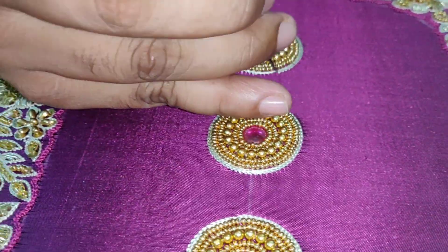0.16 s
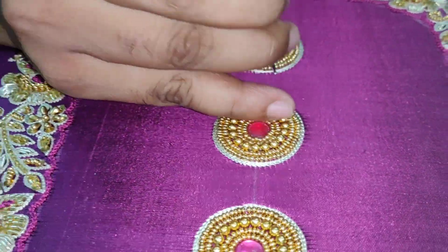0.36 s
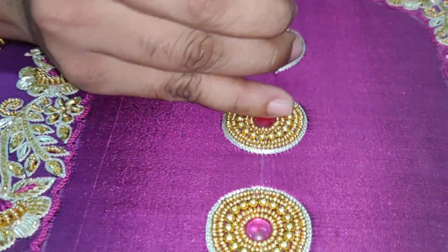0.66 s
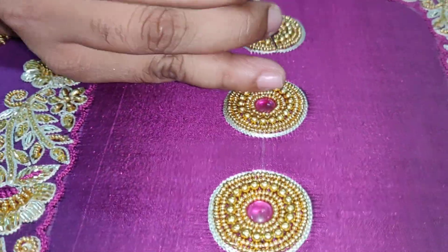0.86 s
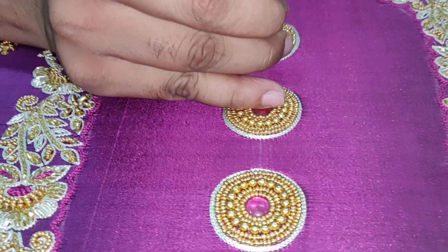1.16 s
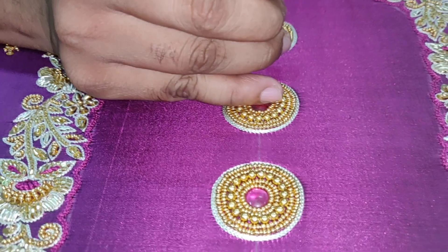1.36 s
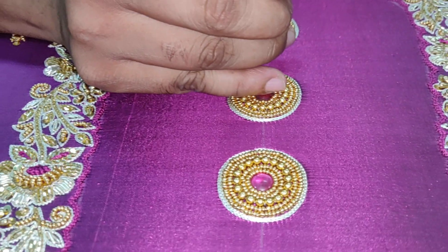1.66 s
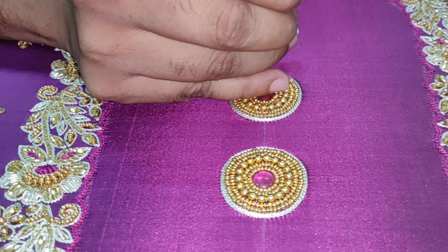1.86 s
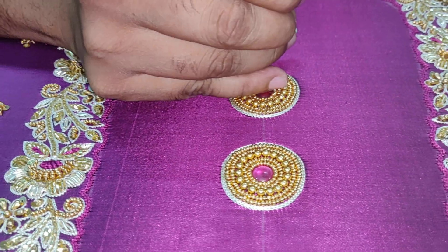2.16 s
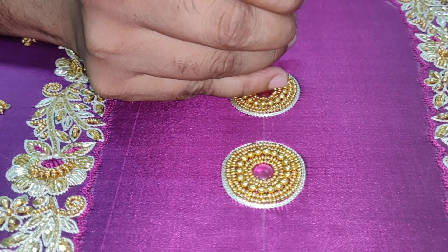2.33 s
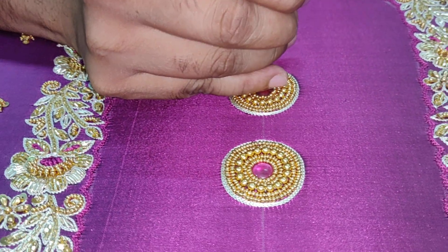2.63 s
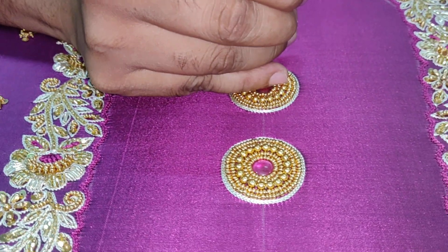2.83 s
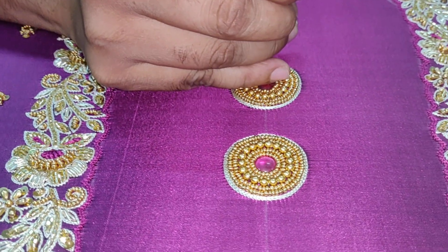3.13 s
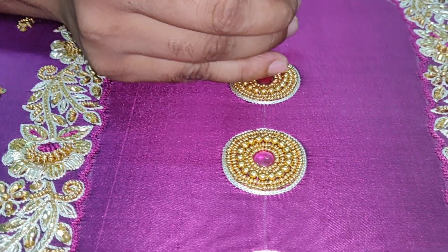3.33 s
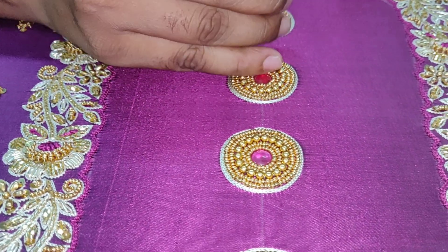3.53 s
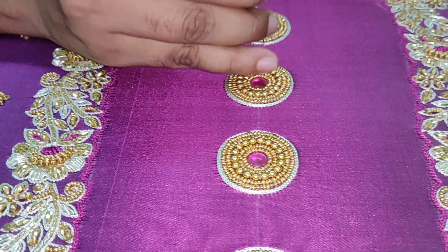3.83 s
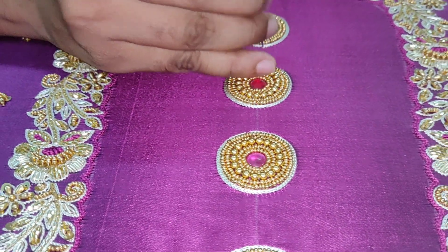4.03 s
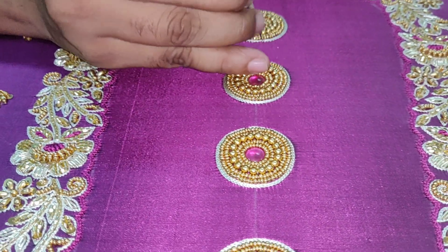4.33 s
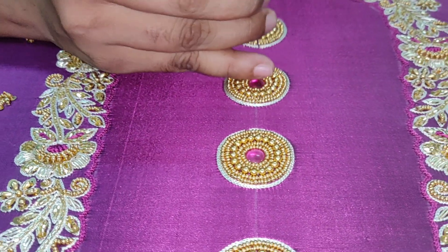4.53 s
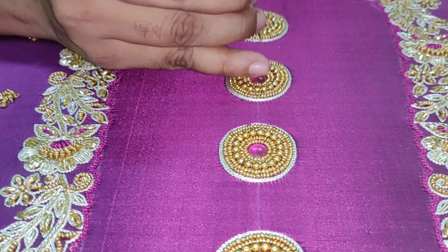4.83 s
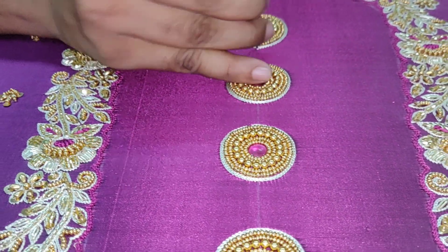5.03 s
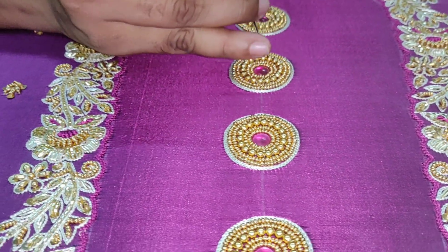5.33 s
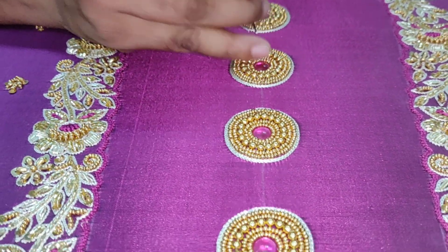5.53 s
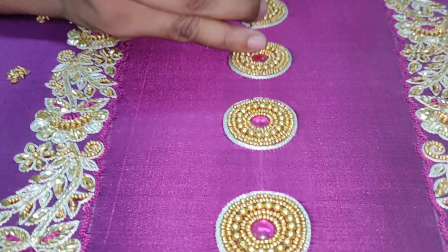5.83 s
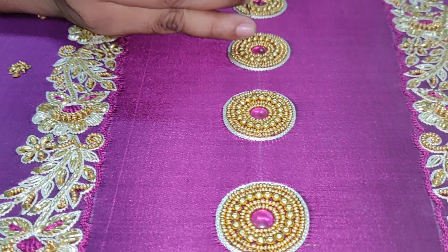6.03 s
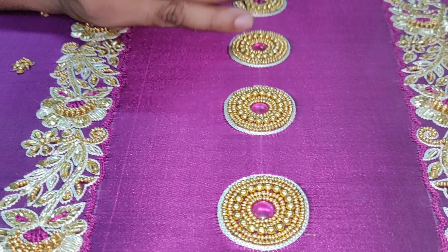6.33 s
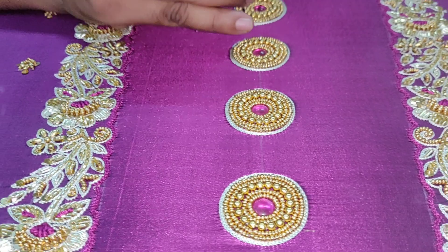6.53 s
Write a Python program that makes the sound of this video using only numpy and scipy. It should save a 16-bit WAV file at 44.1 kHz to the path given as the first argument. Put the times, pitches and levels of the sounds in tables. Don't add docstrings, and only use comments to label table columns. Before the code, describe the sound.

Irregular muffled taps on stretched fabric open the scene, some with a crisp prick through the weave. A longer quiet stretch follows, with grainy thread friction, a few bead knocks and little finger clicks. Light taps resume and become a brisk regular series of rounded thumps to the end. Everything is close and dry in a quiet room, picked up by a hand-held phone with low handling noise and a faint high hissing tone.

```python
import sys
import numpy as np
from scipy import signal
from scipy.fft import rfft, irfft
from scipy.io import wavfile
from scipy.ndimage import uniform_filter1d

SR = 44100
rng = np.random.default_rng(int(sys.argv[2]) if len(sys.argv) > 2 else 0)


def file_out(sig):
    cols = np.atleast_2d(sig).T
    lim = np.clip(cols, -1, 1)
    pcm = np.round(lim * 32767).astype(np.int16)
    wavfile.write(sys.argv[1], SR, pcm)


def gain_from_db(level_db):
    decades = np.asarray(level_db, float) / 20
    return 10 ** decades


N = 294588


def colour(x, points):
    hz, db = np.transpose(points)
    f = np.fft.rfftfreq(N, 1 / SR) + 1
    gain_db = np.interp(np.log(f), np.log(hz), db, left=-60, right=-80)
    y = irfft(rfft(x) * gain_from_db(gain_db), N)
    return y / np.std(y)


def walk(rate):
    hold = int(SR / rate)
    levels = np.repeat(rng.standard_normal(N // hold + 1), hold)
    return 1.93 * uniform_filter1d(uniform_filter1d(levels, hold), hold)[:N]


def add(out, s, wave):
    i = max(int(s * SR), 0)
    out[..., i:i + wave.shape[-1]] += wave[..., :N - i]


def band(x, lo_hz, hi_hz):
    return signal.sosfilt(signal.butter(1, [lo_hz, hi_hz], "band", fs=SR, output="sos"), x)


def swell(t, rise_s):
    return (t / (2 * rise_s)) ** 2 * np.exp(2 - t / rise_s)


def tilt(pan_db):
    return np.array([[.5], [-.5]]) * pan_db


def plus_shake(db, shake_db, shaken):
    return 10 * np.log10(gain_from_db(2 * db) + gain_from_db(2 * shake_db) * shaken)


def grainy(points, rate, spread_db, share, like):
    size_db = spread_db * np.minimum(rng.exponential(size=(3, N)), 2.5)
    grains = (rng.random((3, N)) < rate / SR) * gain_from_db(size_db)
    grains = signal.lfilter([1], [1, -.93], grains) * rng.standard_normal((3, N))
    x = rng.standard_normal((3, N)) + share * grains / np.std(grains)
    return colour(like * x[0] + x[1:], points)


def room_tone():
    # (frequency [Hz], spectral level [dB per Hz])
    room_spectrum = [(25, -7), (60, 14), (120, 5), (300, -22), (700, -15), (2000, -27.5), (5000, -22),
                     (9000, -29)]
    return grainy(room_spectrum, 7.2, 1.5, 0.084, 0.067) * gain_from_db(-58.0 + 1.3 * walk(3.5))


def treble_air(slide_db):
    # (frequency [Hz], spectral level [dB per Hz])
    air_spectrum = [(9000, -2.5), (11000, -9.5), (14000, -3.5), (15400, -6.5), (15800, -2), (16100, -35)]
    air_db = -74 + 0.47 * (slide_db + 58.5)
    return grainy(air_spectrum, 10, 1.43, .1, 0.11) * gain_from_db(air_db + 1.24 * walk(12) + np.array([[-2], [4]]))


def grip_wobble(grip_db, shaken):
    wobble_spectrum = [(5, -1), (12, 9.5), (22, -1.5), (35, -2.5), (60, -19)]  # (Hz, dB per Hz)
    wobble_db = plus_shake(grip_db, -13.5, shaken)
    hand_share = gain_from_db(2 * (grip_db - wobble_db))
    return grainy(wobble_spectrum, 14, 1.6, 0.23, 1.09) * gain_from_db(wobble_db + 1.5 + tilt(8 * hand_share))


def grip_drag(drag_db, drag_pan):
    # (frequency [Hz], spectral level [dB per Hz])
    drag_spectrum = [(40, 1), (70, 9), (150, 0.5), (300, -4), (500, -8), (1000, -25), (2000, -34)]
    level_db = drag_db + 1.9 * walk(20) + 1.48 * walk(5.4) + 2.5
    return grainy(drag_spectrum, 80, 3.6, 0.52, 0.62) * gain_from_db(level_db + tilt(drag_pan))


def creaks(drag_db, drag_pan):
    size = gain_from_db(3.5 * np.minimum(rng.exponential(size=N), 2))
    slips = (rng.random(N) < 70 / SR) * rng.standard_normal(N) * size
    slips = band(band(slips, 100, 1060), 100, 1060)
    return slips * gain_from_db(drag_db + 31.5 - 0.71 * drag_pan) * gain_from_db([[-25], [0]])


def ticks():
    # (time [s], level [dB], softness [dB])
    finger_ticks = [(0.0122, -32, 1.5), (0.0601, -29.5, 4.5), (0.1341, -37.5, 9.5), (0.2292, -21, -6),
                    (0.3946, -24.5, -34), (0.4214, -32, -4.5), (0.572, -33.5, -20), (0.8105, -20.5, 2),
                    (0.956, -42, 13), (1.194, -37, 9), (1.2597, -33.5, 4.5), (1.2643, -33.5, 4.5),
                    (1.3134, -28.5, 5), (1.3889, -34.5, -10), (1.403, -27, -1), (1.4104, -23, 3.5),
                    (1.5566, -24.5, -4), (1.6637, -29.5, 3.5), (2.2459, -40, 12), (2.3675, -30, 6),
                    (2.4408, -37.5, 7.5), (2.6049, -29.5, 7), (2.718, -35.5, -17), (2.7414, -31, -34),
                    (2.9595, -33, -4), (2.9811, -33, -4.5), (3.5219, -33.5, 4.5), (4.0018, -33.5, 2.5),
                    (4.4137, -31.5, -3.5), (5.1953, -36, -30)]
    # (time [s], level [dB])
    faint_slips = [(0.18, -51), (0.234, -48), (0.5308, -39.5), (1.1338, -40.5), (1.1518, -44), (1.229, -41),
                   (1.4172, -33.5), (1.518, -36), (1.5355, -34), (2.5698, -35), (2.6646, -38.5),
                   (2.711, -49), (2.836, -46), (2.9549, -46), (3.079, -46), (3.278, -48), (3.2921, -42),
                   (4.8975, -42), (4.9249, -36), (5.152, -43.5), (6.311, -45)]
    out, t = np.zeros((2, N)), np.arange(600) / SR
    rows = finger_ticks + [(s, db, 4) for s, db in faint_slips]
    chance = rng.random((len(rows), 2))
    for (s, db, soft_db), c in zip(rows, chance):
        leak_s = 0.00025 * gain_from_db(1.7 * soft_db)
        step = (1 - np.exp(-t / .00006)) * np.exp(-t / leak_s)
        hardness = (1 - np.tanh(soft_db / 4)) / 2
        step = step - .5 * swell(t, 0.25 * leak_s + .00005) * hardness
        level_db = db + np.array([[-20], [11]]) + 0.38 * max(soft_db, 0)
        add(out, s - .0002, np.sign(c[0] - .5) * gain_from_db(level_db) * step)
    return out


def thread_rustle(slide_db, shaken):
    # (frequency [Hz], spectral level [dB per Hz])
    rustle_spectrum = [(300, -0.5), (700, 1), (1500, -1.5), (3000, -5), (5000, -2), (9000, -3.5)]
    rustle_db = plus_shake(slide_db, -49, shaken)
    pan_db = -.9 * (slide_db + 58.5)
    level_db = rustle_db + 1.3 * walk(25.04) + 1.52 * walk(5.96) + 2
    return grainy(rustle_spectrum, 300, 4.5, 0.49, 0.2) * gain_from_db(level_db + tilt(pan_db))


def beads():
    # (time [s], click level [dB], scrape level [dB], scrape decay [s], scrape frequency [Hz])
    bead_moves = [
        (1.7225, -40.5, -42, 0.079, 890),
        (1.8105, -42.5, -50.5, 0.021, 1100),
        (1.858, -51.5, -54, 0.042, 980),
        (3.757, -53, -61, 0.061, 9100),
        (1.49, -55, -60, 0.15, 4500),
        (3.019, -65, -63, 0.083, 5000),
        (1.8, -67, -44, 0.033, 740),
        (3.757, -70, -53, 0.044, 1350),
        (2.73, -70, -57, .02, 2000),
        (3.25, -70, -60.5, .05, 4000),
    ]
    out, t = np.zeros((2, N)), np.arange(12000) / SR
    noise = rng.standard_normal((len(bead_moves), 2, len(t)))
    patchy = 1 + 0.31 * np.sin(2 * np.pi * 45 * t)
    for (s, click_db, scrape_db, decay_s, hz), n in zip(bead_moves, noise):
        click = gain_from_db(click_db + 13.5) * band(n * np.exp(-t / 0.0015), 2700, 9700)
        scrape = n * patchy * np.minimum(t / 0.0073, 1) * np.exp(-t / decay_s)
        add(out, s, click + gain_from_db(scrape_db + 13) * band(scrape, 0.31 * hz, 2 * hz))
    return out


def blows():
    # (time [s], sway level [dB], drum level [dB], frame level [dB])
    stabs = [(0.059, -27.5, -46, -55), (0.101, -27, -48, -61), (0.151, -21, -37.5, -38),
             (0.303, -22.5, -30.5, -30), (0.49, -28, -47, -48), (0.533, -21, -30.5, -35),
             (0.685, -22, -26, -26), (0.86, -28, -44, -40.5), (0.906, -17.5, -22, -25.5),
             (1.06, -23, -28.5, -29), (3.422, -31, -45, -40), (3.738, -26.5, -36, -42.5),
             (3.839, -34, -41.5, -41), (4.115, -34, -36, -45.5), (4.342, -20.5, -22, -25.5),
             (4.362, -24.5, -30, -29), (4.66, -22, -24.5, -34), (4.833, -29.5, -35.5, -44),
             (4.866, -32, -29, -34.5), (4.886, -23.5, -23.5, -38.5), (5.067, -26.5, -26.5, -29),
             (5.287, -18, -19.5, -24.5), (5.438, -30.5, -33.5, -42), (5.463, -32.5, -30.5, -37),
             (5.639, -29.5, -36, -55), (5.675, -19.5, -18, -23), (5.827, -26.5, -26.5, -34),
             (6.04, -22.5, -21.5, -31), (6.199, -27.5, -25.5, -33.5), (6.414, -20, -19.5, -27)]
    # (time [s], sway level [dB], drum level [dB])
    faint_stabs = [(0.346, -41, -37), (0.432, -31, -58), (0.457, -38, -48), (0.739, -44, -36.5),
                   (0.813, -36, -40), (1.101, -39, -38.5), (1.486, -39.5, -44), (3.863, -46, -37.5),
                   (3.975, -39, -52), (4.303, -31, -44), (4.427, -46.5, -46), (4.786, -35, -50),
                   (4.921, -45, -39), (5.206, -33, -57), (5.534, -36.5, -41), (5.592, -33.5, -42),
                   (5.754, -40, -41), (5.965, -36, -57), (6.01, -31, -42), (6.108, -43, -49),
                   (6.254, -45, -41.5), (6.335, -36, -55), (6.364, -39, -44), (6.48, -35, -42),
                   (6.546, -42, -48)]
    return stabs + [(s, sway_db, drum_db, drum_db - 10) for s, sway_db, drum_db in faint_stabs]


def shake():
    lead_s, tail_s = 0.036, 0.064
    t = np.arange(N) / SR
    power = np.zeros(N)
    for s, sway_db, _, _ in blows():
        power += gain_from_db(2 * sway_db) * np.exp(np.minimum((t - s) / lead_s, (s - t) / tail_s))
    return power


def pricks():
    # (time [s], left level [dB], right level [dB], brightness [dB])
    weave_pricks = [(0.1428, -34.5, -31, 5.5), (0.2976, -20, -18.5, -10), (0.304, -53, -52, -11),
                    (0.5148, -49, -34, 4), (0.6786, -18.5, -19, -6), (0.887, -37, -30.5, 1),
                    (0.8988, -35.5, -24, -26), (1.0536, -21.5, -23, -5), (1.5972, -31, -25.5, -30),
                    (1.7215, -23, -19.5, -16.5), (4.3339, -30.5, -39, 17), (4.3528, -33, -32, -13),
                    (4.653, -64, -48, -6), (4.8589, -39.5, -42, -3), (5.0613, -30, -30, -31),
                    (5.2791, -27.5, -24.5, -26), (5.2836, -50, -43.5, -6), (5.2932, -41, -30, -8),
                    (5.4548, -42, -40.5, -20), (5.6654, -25.5, -19, -10), (5.674, -27.5, -32, -10),
                    (5.8225, -44, -40, -20), (6.1937, -34, -35, -58), (6.4071, -47, -43, -1),
                    (6.415, -43, -57, -8), (6.6162, -52, -64, -1)]
    out, edge, t = np.zeros((2, N)), np.zeros((2, N)), np.arange(4000) / SR
    noise = rng.standard_normal((len(weave_pricks), 3, len(t)))
    shape = np.exp(-t / 0.00021) + 0.29 * np.exp(-t / 0.0026) + 0.023 * np.exp(-t / 0.071)
    for (s, left_db, right_db, bright_db), n in zip(weave_pricks, noise):
        burst = (n[0] + n[1:]) * shape
        wave = band(burst, 640, 5460) + gain_from_db(bright_db - 5.5) * band(burst, 5950, 12000)
        add(out, s - .0005, gain_from_db(np.array([[left_db], [right_db]]) + 4.0) * wave)
        add(edge, s - .0005, gain_from_db(right_db + 0.67 * bright_db - 12.5) * burst)
    edge = signal.sosfilt(signal.butter(2, [12000, 16300], "band", fs=SR, output="sos"), edge)
    return out, gain_from_db([[-8], [0]]) * edge


def thumps():
    # (frequency [Hz], 60 dB decay time [s], level [dB])
    frame_modes = [(207, 0.11, -1), (330, 0.088, -4.5), (439.7, 0.072, 1.5), (689, 0.032, 0.5),
                   (1037, 0.036, -9.5), (518, 0.32, -16.5), (814, 0.59, -29.5)]
    sway_rise_s, drum_rise_s, drum_base_hz = 0.00601, 0.00481, 154.9
    out, t = np.zeros((2, N)), np.arange(12000) / SR
    rows = blows()
    chance = rng.random((len(rows), 18))
    noise = rng.standard_normal((len(rows), 2, len(t)))
    for (s, sway_db, drum_db, frame_db), c, n in zip(rows, chance, noise):
        sway_hz = 70.2 + 0.5 * (drum_db - sway_db)
        turn = sway_hz * t + c[0] + np.array([[0], [.05]])
        sway = gain_from_db(sway_db + 0.5) * swell(t, sway_rise_s) * np.cos(2 * np.pi * turn)
        add(out, s - 2 * sway_rise_s, sway * gain_from_db([[0], [1]]))
        drum_hz = drum_base_hz * (0.906 + 0.213 * c[1])
        turn = drum_hz * t + c[2] + np.array([[0], [.09]])
        drum = gain_from_db(drum_db - 0.5) * swell(t, drum_rise_s) * np.cos(2 * np.pi * turn)
        add(out, s - 2 * drum_rise_s, drum * gain_from_db([[0], [-3]]))
        shudder = ((n[0] + 0.84 * n) * np.exp(-t / 0.023))[:, :5000]
        add(out, s - .006, gain_from_db(frame_db + 3.5) * band(band(shudder, 210, 590), 210, 590))
        for k, (hz, t60, db) in enumerate(frame_modes):
            ring = np.exp(-np.log(1000) * t / t60) * np.minimum(t / 0.0058, 1)
            turn = hz * (.96 + 0.0996 * c[3 + k]) * t + c[10 + k] + np.array([[0], [.16]])
            level = gain_from_db(frame_db + db + np.array([[1], [-2]]))
            add(out, s - .009, level * ring * np.sin(2 * np.pi * turn))
    return out


def ports(x):
    # (resonance [Hz], width [Hz], gain [dB], cut [Hz])
    port_modes = [
        (6316, 470, 14.5, 6850),
        (9460, 1900, 2.5, 8280),
    ]
    out = []
    for v, (hz, width, db, cut_hz), hiss_db in zip(x, port_modes, (-64, -72)):
        v = v + gain_from_db(hiss_db) * band(rng.standard_normal(N), 5900, 7300)
        v = v + gain_from_db(db) * signal.lfilter(*signal.iirpeak(hz, hz / width, fs=SR), v)
        out.append(signal.sosfilt(signal.cheby2(5, 26, cut_hz * 1.25, fs=SR, output="sos"), v))
    return np.array(out)


def scene():
    # (time [s], thread and sleeve rustle level [dB], unsteadiness of the grip [dB])
    hand_levels = [(0.0, -60, -39.5), (0.3, -63.5, -40), (0.72, -64.5, -43), (0.92, -61.5, -41),
                   (1.08, -56, -38), (1.4, -59, -41.5), (1.469, -53.5, -39.5), (1.71, -52.5, -41.5),
                   (1.88, -60, -44.5), (2.36, -57.5, -45), (2.58, -57.5, -49), (2.8, -59, -45.5),
                   (3.3, -56, -43.5), (3.56, -62, -46), (4.05, -63, -46.5), (4.35, -62.5, -48),
                   (5.1, -63.5, -43), (6.68, -62, -46.5)]
    s, *columns = np.transpose(hand_levels)
    slide_db, grip_db = (np.interp(np.arange(N) / SR, s, c) for c in columns)
    shaken = shake()
    rest_db = grip_db - 13
    drag_db = plus_shake(rest_db, -27.5, shaken)
    drag_pan = np.minimum(1.2 * (drag_db - rest_db) - 4, 6)
    needle, edge = pricks()
    heard = thumps() + needle + beads() + ticks()
    heard += creaks(drag_db, drag_pan) + grip_drag(drag_db, drag_pan)
    heard += thread_rustle(slide_db, shaken) + grip_wobble(grip_db, shaken) + room_tone()
    heard = ports(heard) + treble_air(slide_db) + edge
    return heard + gain_from_db(-33) * heard[::-1]


def top_cut(x):
    return signal.sosfilt(signal.butter(12, 17140, fs=SR, output="sos"), x)


def record(dry):
    return top_cut(dry)


dry = scene()
out = record(dry)
file_out(out)
```